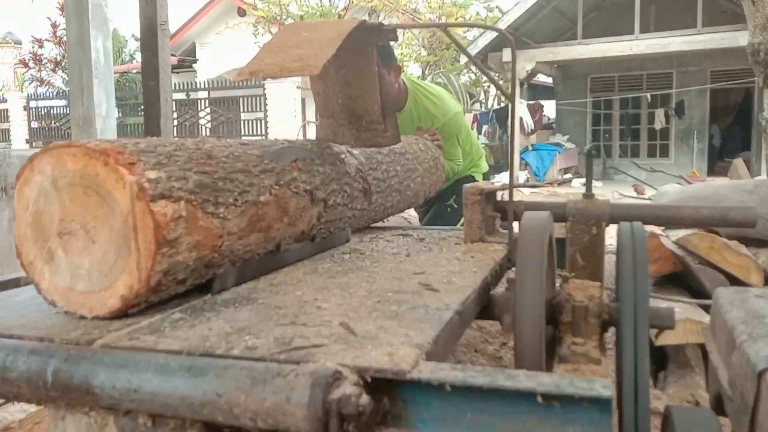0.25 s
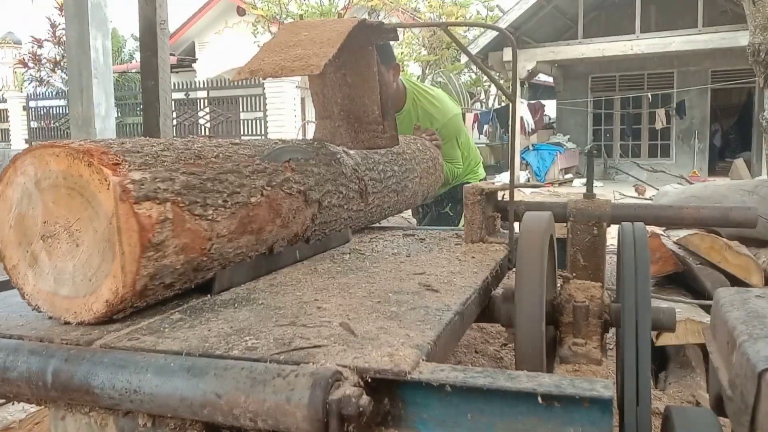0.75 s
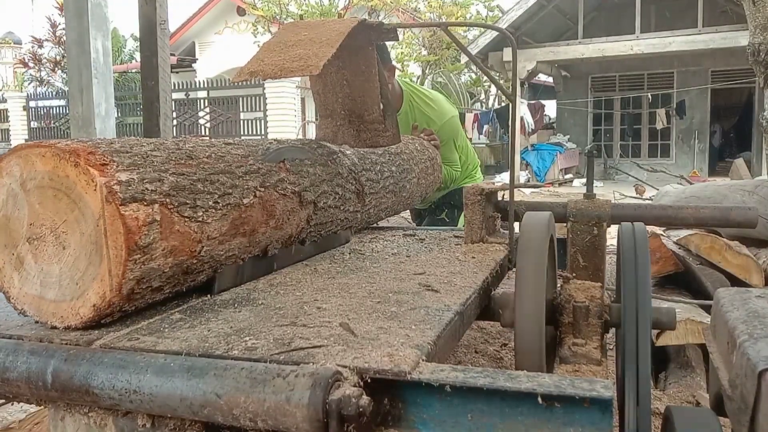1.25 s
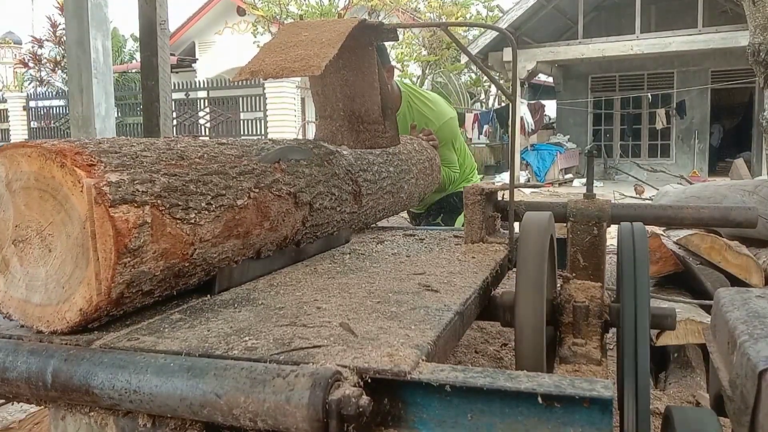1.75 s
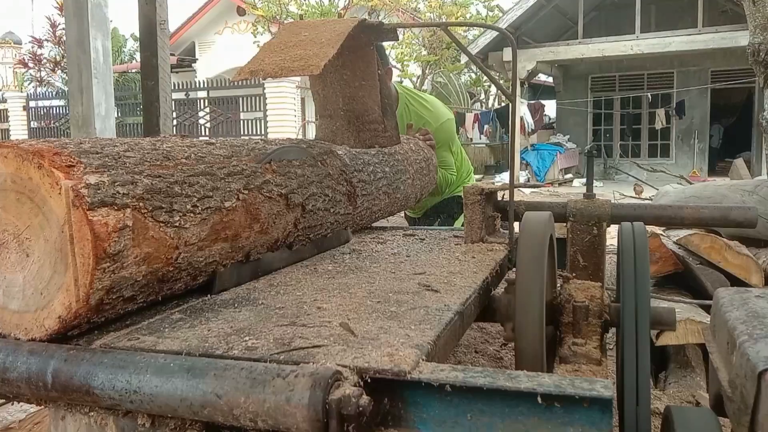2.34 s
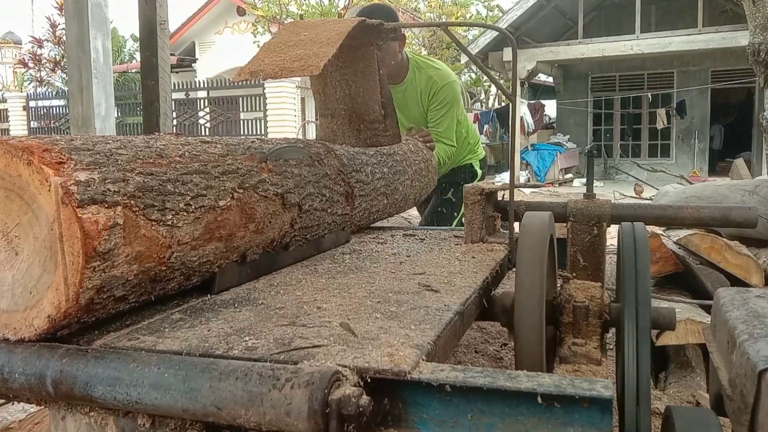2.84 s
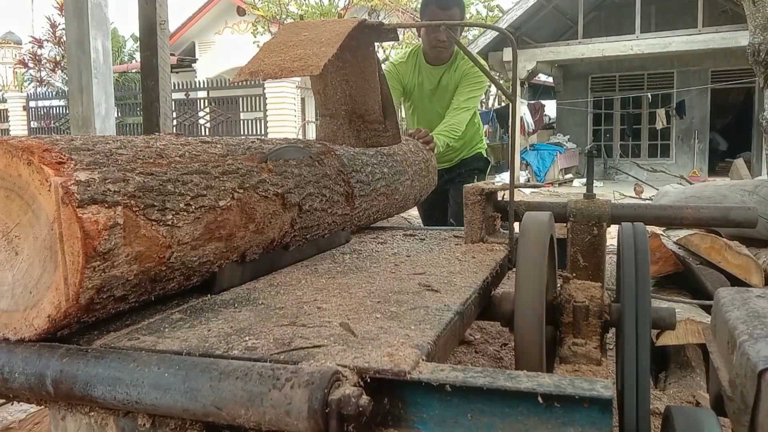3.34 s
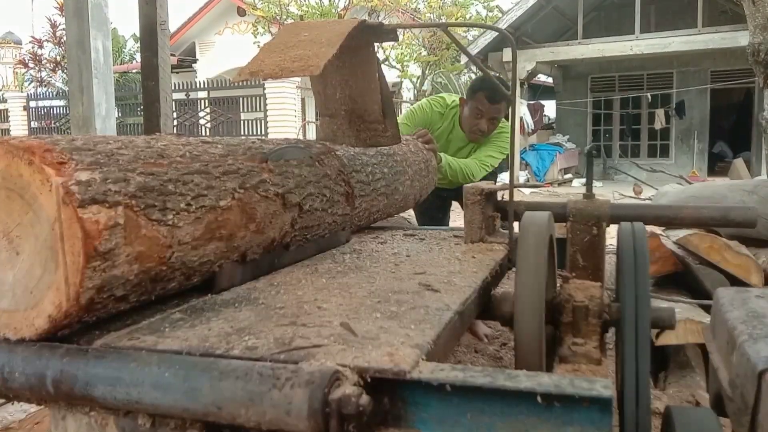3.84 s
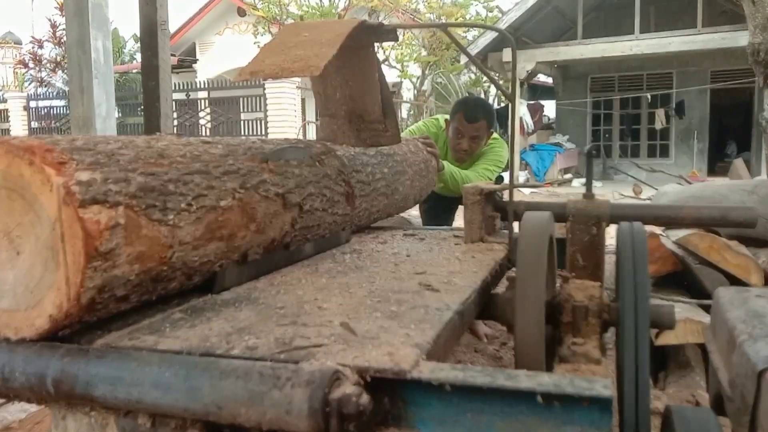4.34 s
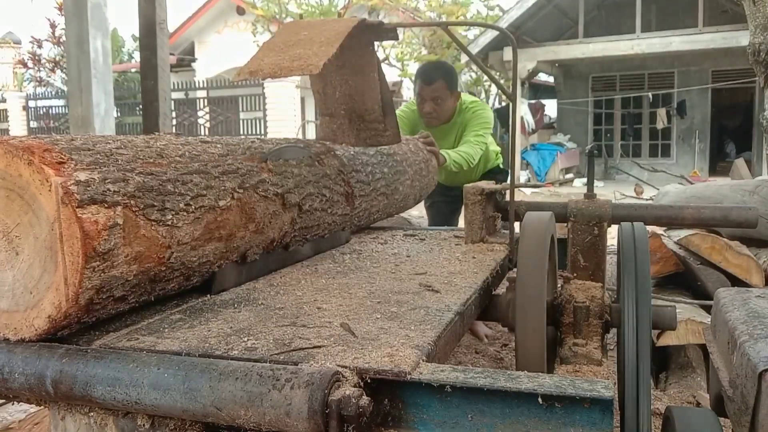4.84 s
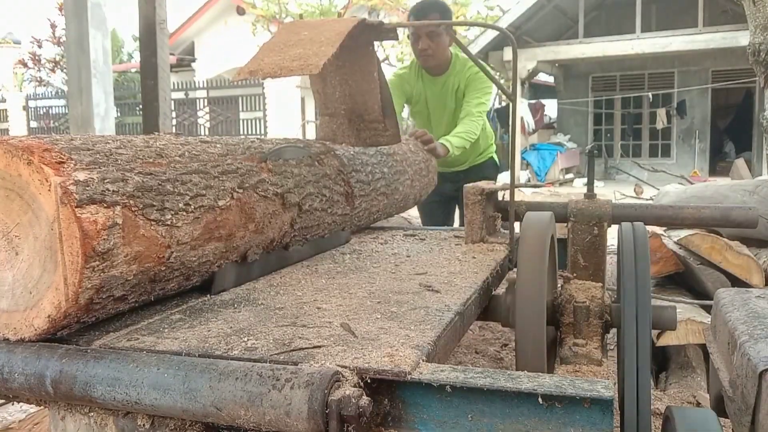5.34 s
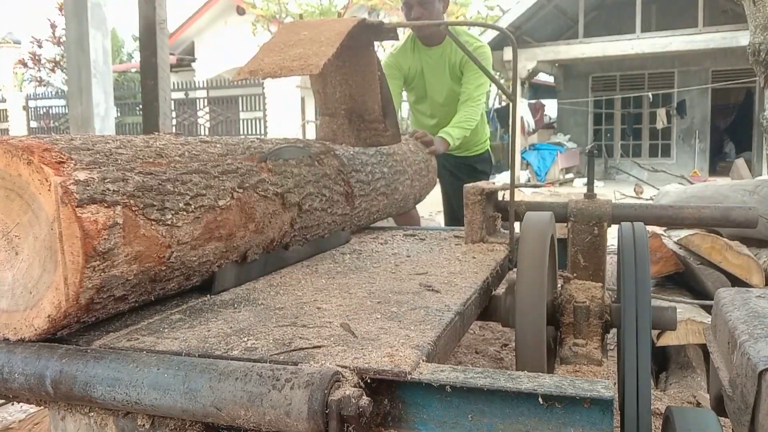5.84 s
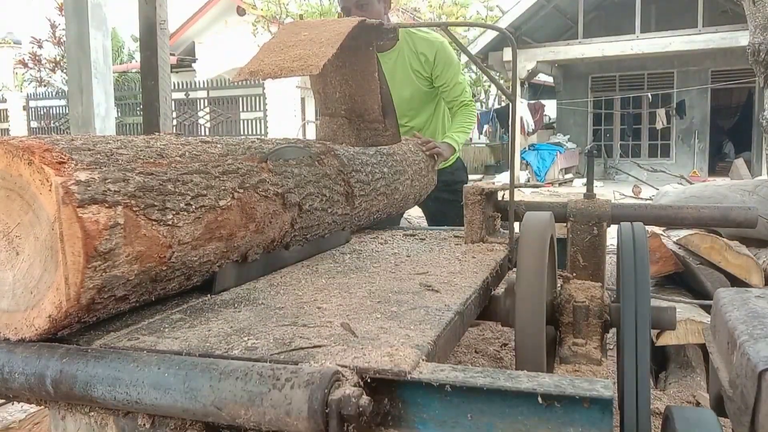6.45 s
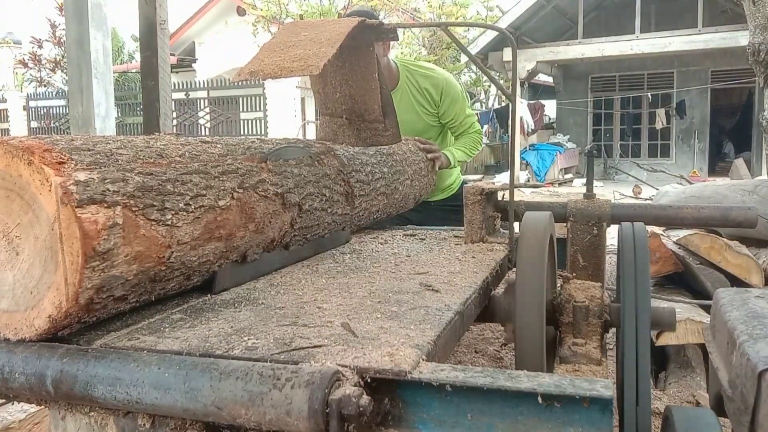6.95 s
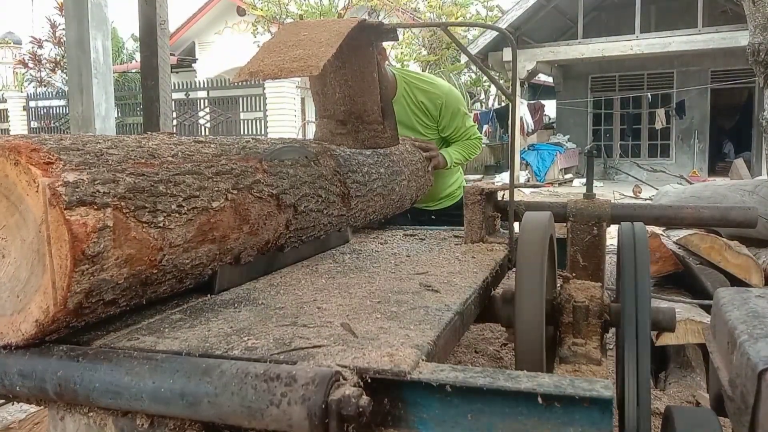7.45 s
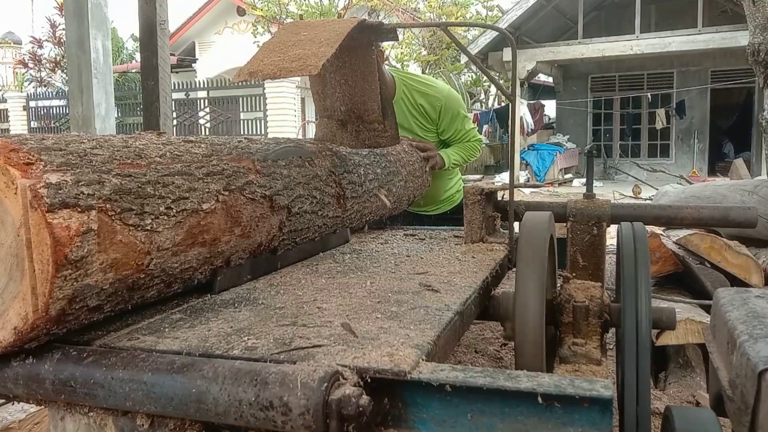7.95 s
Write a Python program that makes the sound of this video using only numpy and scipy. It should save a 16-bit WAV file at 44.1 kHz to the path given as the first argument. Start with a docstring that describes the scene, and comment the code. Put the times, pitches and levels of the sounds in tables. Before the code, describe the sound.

A large belt-driven circular saw rips a log in an open-sided shed. Bright, pulsing rasp and ringing blade sit over a fast, even engine thump with clatter and gas spits. After about three seconds the cut eases to a light rub, the engine picks up and steel squeals in short swells; near the end the rasp surges back and the engine bogs down. Close microphone, thin bass, little echo.

```python
"""The rasp and ringing of a big circular saw ripping a log come first, over the thump of its slow engine.
The single-cylinder engine drives the blade by a belt in an open-sided shed; it thumps, clatters and spits.
The cut eases while the sawyer changes his grip, the engine picks up, then he leans into the log again.
Blows are clicks through resonators, tearing and gas are coloured noise swelling with each revolution,
and blade and steel are narrow resonances shaken by noise."""
import sys
import numpy as np
from scipy import signal
from scipy.fft import rfft, irfft
from scipy.io import wavfile

SR = 44100
rng = np.random.default_rng(int(sys.argv[2]) if len(sys.argv) > 2 else 0)


def dump(signal):
    """Clip the signal to [-1, 1] and save it as 16-bit WAV at the path in sys.argv[1]."""
    limited = np.clip(np.atleast_2d(signal).T, -1, 1)
    pcm = np.round(limited * 32767).astype(np.int16)
    wavfile.write(sys.argv[1], SR, pcm)


N = 362046
TIME = np.arange(N) / SR  # s


def from_db(db):
    """Level to amplitude: 20 dB is a factor of ten."""
    return 10 ** (np.asarray(db) / 20)


def rms_one(x):
    """Normalisation to unit root-mean-square amplitude."""
    return x / np.sqrt(np.mean(x ** 2) + 1e-20)


def in_time(rows):
    """Linear interpolation of each column of a time curve at every sample."""
    s, *columns = np.transpose(rows)
    return [np.interp(TIME, s, column) for column in columns]


def noise(spectrum):
    """Spectral shaping: white noise weighted by a curve of (f/Hz, density level/dB), rms 1."""
    hz, db = np.transpose(spectrum)
    log_hz = np.log(np.fft.rfftfreq(N, 1 / SR) + 1)
    gain = from_db(np.interp(log_hz, np.log(hz), db))
    return rms_one(irfft(gain * rfft(rng.standard_normal(N)), N))


def flicker(per_s, depth_db):
    """Random amplitude modulation: a gain gliding between normally distributed levels."""
    steps = rng.standard_normal(N // 10)
    return from_db(depth_db * np.interp(TIME * per_s, np.arange(len(steps)), steps))


def high_pass(x, hz):
    """Second-order high-pass filtering: the bass falls 12 dB per octave."""
    return signal.sosfilt(signal.butter(2, hz, "high", fs=SR, output="sos"), x)


def resonate(x, hz, width_hz):
    """A damped mode as a two-pole resonance: its width sets its decay, its peak gain is about 1."""
    radius = np.exp(-np.pi * width_hz / SR)
    zeros = np.array([1, 0, -1]) * (1 - radius ** 2) / 2
    poles = [1, -2 * radius * np.cos(2 * np.pi * hz / SR), radius ** 2]
    return signal.lfilter(zeros, poles, x + 1e-18)


def ringing(force, hz, width_hz):
    """Random excitation of a mode: countless small impacts under a changing force, rms 1."""
    return rms_one(resonate(force * rng.standard_normal(N), hz, width_hz))


def swell(turns, place, width):
    """Cyclic modulation: a bell-shaped rise at one place of every revolution."""
    distance = (turns - place + .5) % 1 - .5
    return np.exp(-.5 * (distance / width) ** 2)


def swells(turns, rows):
    """Superposition of all the rises of a revolution."""
    return sum(from_db(db) * swell(turns, place, width) for place, width, db in rows)


def bell(s, half_s):
    """Gaussian envelope: a smooth rise and fall around one moment."""
    return np.exp(-((TIME - s) / half_s) ** 2)


def shed(x, t60_s=.16):
    """Reverberation: a short, exponentially decaying scatter of echoes from bench, roof and posts."""
    t = TIME[:SR // 2]
    echoes = rng.standard_normal(len(t)) * from_db(-60 * t / t60_s) * (t > .004)
    echoes /= np.sqrt(np.sum(echoes ** 2))
    # bass escapes through the open sides
    echoes = high_pass(echoes, hz=700)
    return signal.fftconvolve(x, echoes)[:N]


def frame(cycles, thump, third_db=-49, fourth_db=-44.5, rumble_db=-48,
          boom_hz=122, boom_width_hz=16, boom_db=-7):
    """Forced vibration: the heavy frame booms after blows and shakes at 3 and 4 times crankshaft speed."""
    # rumble of the frame: f/Hz, spectral density level/dB
    rumble_colour = [(25, -4), (60, 8), (100, 7), (170, -3), (300, -23), (900, -42)]
    # the crankshaft turns twice per four-stroke cycle
    crank = 4 * np.pi * cycles
    third = from_db(third_db) * np.sin(3 * crank)
    fourth = from_db(fourth_db) * np.sin(4 * crank)
    hum = np.sqrt(2) * (third + fourth)
    boom = from_db(boom_db) * resonate(thump, boom_hz, boom_width_hz)
    return boom + hum + from_db(rumble_db) * noise(rumble_colour)


def squeal(cycles, hz=1280, width_hz=26, octave_db=-3):
    """Friction-driven vibration: rubbing steel sings, with an octave where each cycle presses it hardest."""
    tone = signal.hilbert(ringing(1, hz, width_hz))
    # squaring the analytic signal doubles its phase
    octave = tone ** 2 / (np.abs(tone) + 1e-9)
    pressure = swell(cycles, place=0.87, width=0.27)
    return rms_one((pressure * tone + from_db(octave_db) * pressure ** 4 * octave).real)


def rattle(cycles, cut_db, steel_db=-24.9, squeal_base_db=-32.2, squeal_loss_per_cut_db=.65):
    """Impact excitation: loose parts clatter in time with the engine and set the steel ringing."""
    # swells of clatter in one engine cycle: place/cycle, width/cycle, relative level/dB
    clatter_swells = [(0.91, 0.079, -19), (0.55, 0.09, -8), (0.72, 0.063, -19)]
    # how much the loose parts clatter: t/s, level/dB
    looseness = [(0, -21.5), (2.0, -21.5), (2.9, -19.5), (6.9, -21), (8.21, -20.5)]
    # colour of the clatter: f/Hz, spectral density level/dB
    clatter_colour = [(60, -7), (250, 0), (400, -2.5), (800, 0.5), (1100, 0.5), (1370, -1), (1550, -4.5),
                      (2400, -6.5), (3300, -15.5), (6000, -29), (15000, -31.5)]
    # modes of the machine's steel: f/Hz, width/Hz, relative level/dB
    steel_modes = [(430, 14, -12), (533, 20, -11), (765, 35, -11), (1003, 30, -7), (1232, 35, -2.5),
                   (1277, 30, 0)]
    # swells of the squeal while the machine runs light: middle t/s, half length/s, rise/dB
    squeal_swells = [(3.334, .1, 7), (3.9, 0.075, 9), (4.238, .08, 6), (4.744, 0.18, 7.5), (5.954, .16, 5),
                     (6.68, 0.088, 7)]

    clatter_db, = in_time(looseness)
    shaking = rms_one((1 + swells(cycles, clatter_swells)) * flicker(per_s=250, depth_db=1.1))
    clatter = from_db(clatter_db) * shaking * noise(clatter_colour)

    modes = sum(from_db(db) * ringing(shaking ** 2, hz, width) for hz, width, db in steel_modes)
    steel = from_db(steel_db) * rms_one(modes)

    # a loaded blade damps the squeal; when the machine runs light it comes up, at times in a swell
    squeal_db = squeal_base_db - squeal_loss_per_cut_db * (cut_db - cut_db.mean())
    squeal_db = squeal_db + sum(db * bell(s, half_s) for s, half_s, db in squeal_swells)
    return clatter + steel + from_db(squeal_db) * squeal(cycles)


def spits(cycles, cut_db, burst_s=0.0028, ping_hz=2630, ping_width_hz=110, ping_db=4.0):
    """Jet noise: gas spits in every cycle with a metallic ping; load adds a second, sharper spit."""
    # bursts of hiss in one engine cycle: place/cycle, width/cycle, relative level/dB
    hiss_bursts = [(0.87, 0.043, 0.44), (0.01, 0.084, -5.5), (0.29, 0.043, -8)]
    # the hardest firings under load: t/s, level/dB
    hard_firings = [(7.926, -21), (7.937, -27), (8.105, -21)]
    # colour of the gas: f/Hz, spectral density level/dB
    gas_colour = [(700, -15), (1500, 6.5), (3000, 0), (5200, 0.5), (6200, -7), (7200, -0.5), (8200, -12),
                  (9700, -7), (12500, -11), (13800, -8.5), (15000, -12.5)]

    firing = swell(cycles, place=0.727, width=0.025) * flicker(per_s=14, depth_db=1.5)
    firing = from_db(cut_db + 17.5) * firing
    steady = from_db(-20.5) * (swells(cycles, hiss_bursts) + firing) * flicker(per_s=20, depth_db=1.5)
    hard = sum(from_db(db) * bell(s, burst_s) for s, db in hard_firings)
    gas = (steady + hard) * noise(gas_colour)
    ping = resonate(steady * noise(gas_colour), ping_hz, ping_width_hz)
    return gas + from_db(ping_db) * ping


def thumps(cycles, uneven_db=0.07, jitter_s=.00006):
    """Impulse response: intake, firing, valves and exhaust give short damped blows, never quite alike."""
    # blows of one engine cycle: place/cycle, f/Hz, width of each of two resonances in series/Hz, level/dB
    blows = [(0.215, 106, 70, -10.0), (0.231, 160, 45, -3.1), (0.245, 318, 224, -4.1),
             (0.431, 634, 182, -6.8), (0.438, 466, 37, -8.4), (0.498, 740, 350, -5.0),
             (0.571, 424, 210, -8.4), (0.644, 351, 196, -1.3), (0.726, 385, 481, -7.3),
             (0.965, 154, 105, -5.6), (0.969, 271, 293, 1.3)]
    out = np.zeros(N)
    for place, hz, width, db in blows:
        at = np.flatnonzero(np.diff(np.floor(cycles - place)))
        late, strength = rng.standard_normal((2, N))[:, at]
        struck = np.clip(at + (jitter_s * SR * late).astype(int), 0, N - 1)
        clicks = np.zeros(N)
        clicks[struck] = from_db(uneven_db * strength)
        blow = resonate(resonate(clicks, hz, width), hz, width)
        out -= from_db(db) * rms_one(blow)
    return rms_one(out)


def engine(cycles, speed, cut_db, free_cycles_per_s=11.67, thump_db=-22.8, db_per_cycle_per_s=3.7):
    """Periodic excitation: deep, even thumps under rattle and hiss, which carry little bass."""
    # the thumps weaken as the load drags the engine below its free speed
    thump_level_db = thump_db + db_per_cycle_per_s * (speed - free_cycles_per_s)
    thump = from_db(thump_level_db) * thumps(cycles)
    bright = high_pass(rattle(cycles, cut_db) + spits(cycles, cut_db), hz=253)
    return thump + frame(cycles, thump) + bright


def feed():
    """Feed force sets cutting level: returns the cut/dB and its relative coarse tearing/dB over time."""
    # the sawyer leans on the log: start t/s, easing-off t/s, initial cutting level/dB,
    # initial coarse tearing relative to the cut/dB
    pushes = [(-0.1, 2.52, -18.9, -15), (7.168, 7.95, -18.5, -8)]
    # the teeth catch at once with a share of the load, the rest builds up; letting go is gradual
    catch_share, build_s, release_s = .62, 0.16, 0.51
    # while a push lasts the blade works deeper: the cut gets louder and coarser
    louder_db_per_s, coarser_db_per_s = 0.43, 3.5
    # between pushes the blade only rubs in the kerf, a little less as it frees itself
    rub_start_db, rub_coarse_db, drag_db, drag_s = -25, -10.5, 4, 1.6

    cut_db, coarse_db = rub_start_db, rub_coarse_db
    for start, end, push_db, tear_db in pushes:
        held = np.clip(TIME - start, 0, end - start)
        eased = np.maximum(TIME - end, 0)
        attack = (TIME > start) * (1 - (1 - catch_share) * np.exp(-held / build_s))
        load = attack * np.clip(1 - eased / release_s, 0, 1)
        rub_db = cut_db + drag_db * (TIME > end) * np.exp(-eased / drag_s)
        cut_db = (1 - load) * rub_db + load * (push_db + louder_db_per_s * held)
        coarse_db = (1 - load) * coarse_db + load * (tear_db + coarser_db_per_s * held)
    return cut_db, coarse_db


def saw(turns, cut_db, depth_db):
    """Modulated fracture noise and plate modes: teeth tear fibres in surges and the blade sings along."""
    # where the teeth bite harder in one turn of the blade: place/turn, width/turn, relative level/dB
    bites = [(.1, 0.05, 1.5), (0.84, 0.1, -4), (0.72, 0.048, -5.5)]
    # colour of the tearing: f/Hz, spectral density level/dB
    cut_colour = [(900, -5.5), (1800, -10), (2700, -9.5), (3700, -3.5), (4900, -3), (5550, -1.5),
                  (6200, -11), (6900, -9.5), (7500, -13), (8100, -23.5), (9600, -18.5), (12000, -25),
                  (13700, -33), (14700, -23)]
    # modes of the blade: f/Hz, width/Hz, relative level/dB, rise per rise of the cut/(dB/dB)
    blade_modes = [(2637, 82, -2.5, 0.8), (3080, 40, 0, 0.3), (3530, 290, -2.5, 1), (3962, 85, 2.5, 0.8),
                   (4270, 46, 0.5, 1.3), (4620, 160, 2, 1.5), (4890, 180, 3, 1.63), (5130, 65, -1.5, 1.93),
                   (5150, 110, -6.5, 2.8), (6640, 140, -10, 0.5)]

    # the blade wobbles sideways at first, rubbing once more in each turn, then runs truer
    wobble_start, wobble_left, wobble_settles_s = 1.2, 0.24, 1.5
    wobble = wobble_left + wobble_start / (1 + (TIME / wobble_settles_s) ** 10)
    bite = 1 + swells(turns, bites) + wobble * swell(turns, place=0.416, width=0.043)
    force = rms_one(bite * flicker(per_s=80, depth_db=1.03) * flicker(per_s=700, depth_db=1.5))

    # the rasp of the teeth surges, while flying sawdust hisses almost evenly around it
    tearing = noise(cut_colour)
    rasp_band = signal.butter(2, [3100, 6800], "band", fs=SR, output="sos")
    rasp = signal.sosfiltfilt(rasp_band, tearing)
    sawdust = tearing - rasp
    cutting = from_db(cut_db - 1.0) * (force * rasp + force ** 0.059 * sawdust)

    # with more wood against the teeth the rasp gains a lower, coarser body
    body = noise([(1400, -39), (2700, -3.5), (3500, -1), (5000, -16), (9000, -47)])
    coarse = from_db(cut_db + depth_db - 1.5) * force * body

    # a hard feed brings out the screeching modes; the others ring on when it eases
    push_db = cut_db - cut_db.mean()
    plate = 0
    for hz, width, db, follows in blade_modes:
        # the point of contact wanders, so the modes take turns to stand out
        grip = rms_one(force * flicker(per_s=25, depth_db=2.5))
        plate = plate + from_db(db + follows * push_db) * ringing(grip, hz, width)
    return cutting + coarse + from_db(-34.5) * plate


def scene(start_cycle=.459, belt_ratio=.8414, shed_db=-16):
    """Kinematic coupling: the belt ties the blade's turning to the engine's; the pushes load both."""
    # engine speed: t/s, four-stroke cycles per second/(1/s)
    speed_curve = [(0.0, 11.471), (0.5, 11.381), (1.1, 11.302), (1.8, 11.383), (2.6, 11.251), (3.2, 11.662),
                   (4.2, 11.687), (5.5, 11.658), (7.1, 11.675), (7.7, 11.217), (8.21, 10.712)]
    speed, = in_time(speed_curve)
    cycles = np.cumsum(speed) / SR
    cut_db, coarse_db = feed()
    blade = high_pass(saw(cycles * belt_ratio, cut_db, coarse_db), hz=563)
    machine = engine(cycles + start_cycle, speed, cut_db) + blade
    return (machine + from_db(shed_db) * shed(machine))[None]


def record(dry, cutoff_hz=15600):
    """Band limiting and soft saturation: the microphone thins deep bass, peaks are rounded, the top is cut."""
    thin = high_pass(dry, hz=56.0)
    rounded = 1.088 * np.tanh(thin / 1.08)
    top_cut = signal.ellip(12, .2, 90, cutoff_hz, fs=SR, output="sos")
    return signal.sosfilt(top_cut, rounded)


dry = scene()
out = record(dry)
dump(out)
```